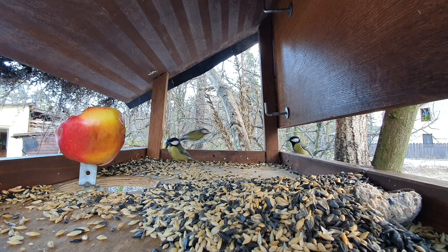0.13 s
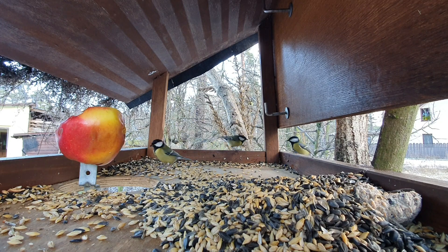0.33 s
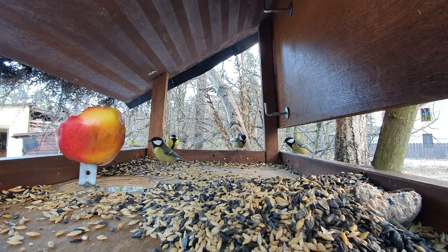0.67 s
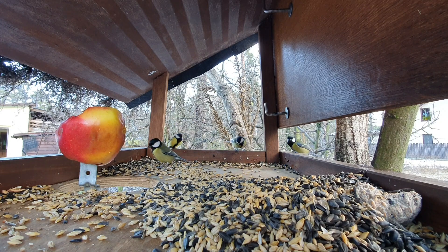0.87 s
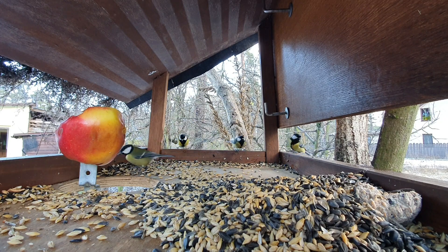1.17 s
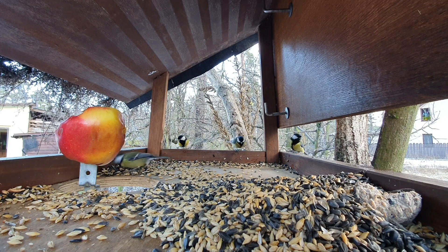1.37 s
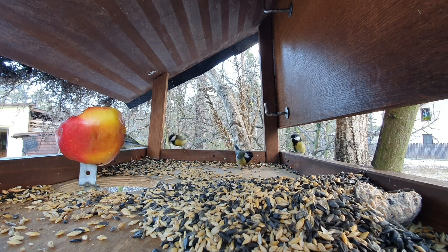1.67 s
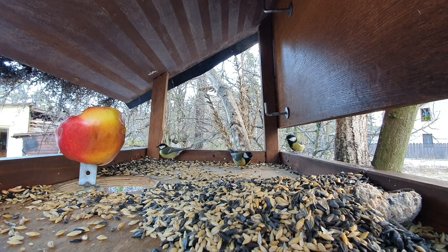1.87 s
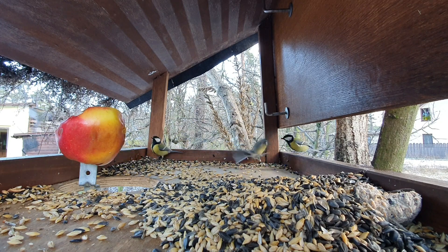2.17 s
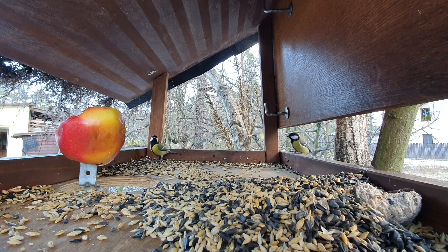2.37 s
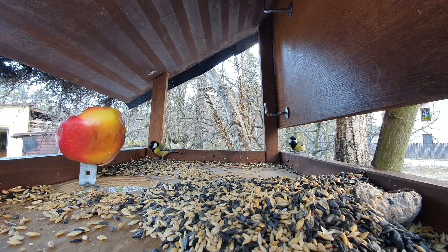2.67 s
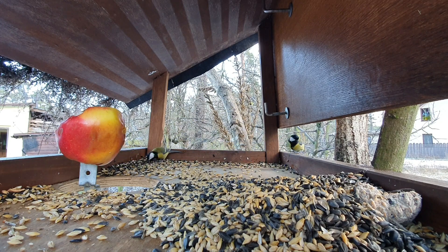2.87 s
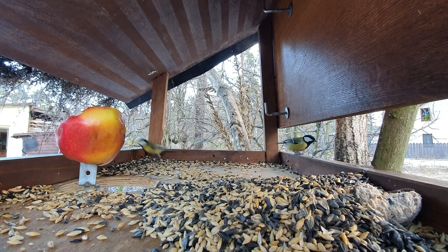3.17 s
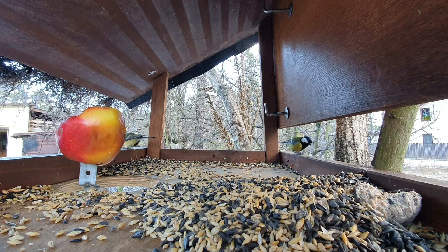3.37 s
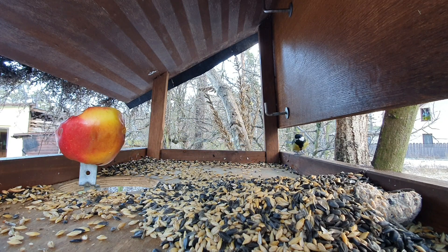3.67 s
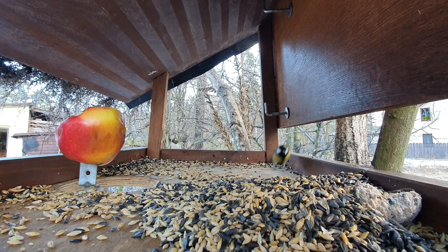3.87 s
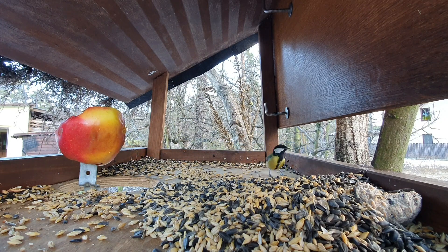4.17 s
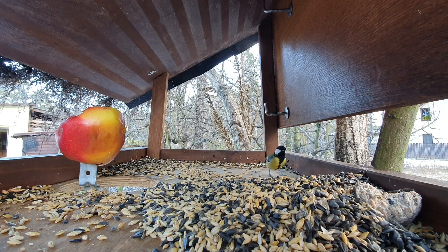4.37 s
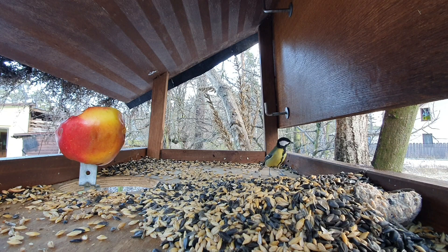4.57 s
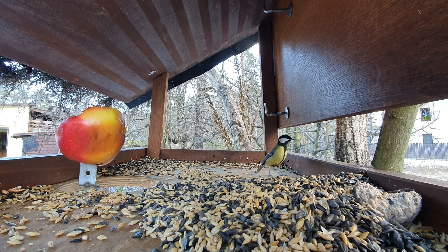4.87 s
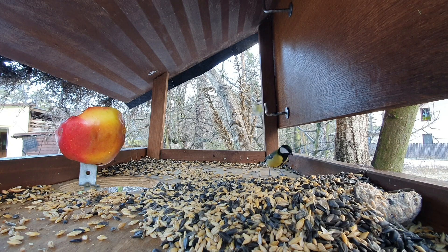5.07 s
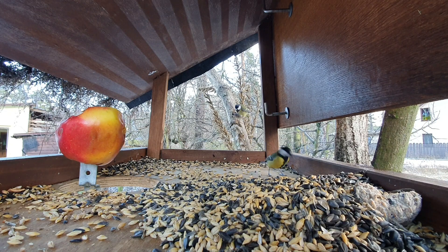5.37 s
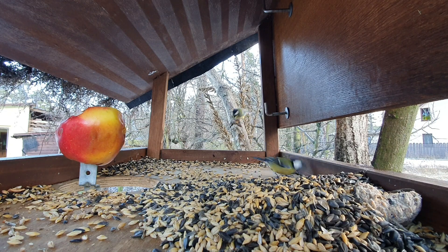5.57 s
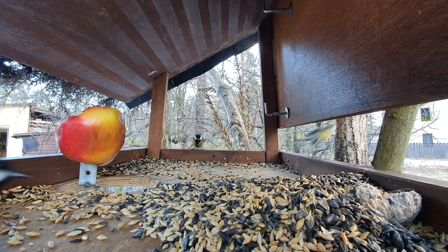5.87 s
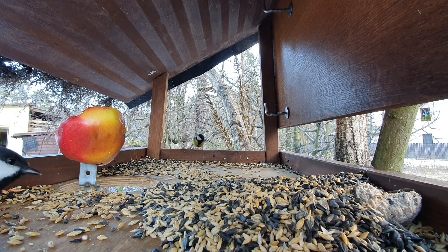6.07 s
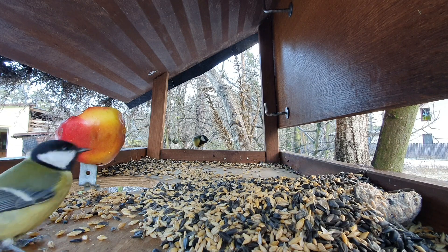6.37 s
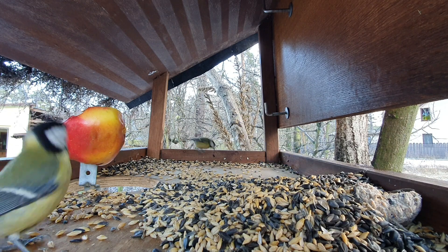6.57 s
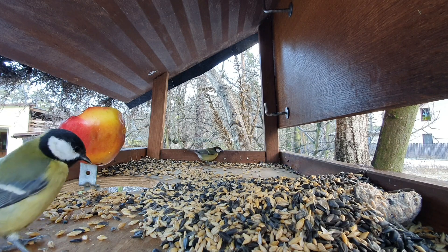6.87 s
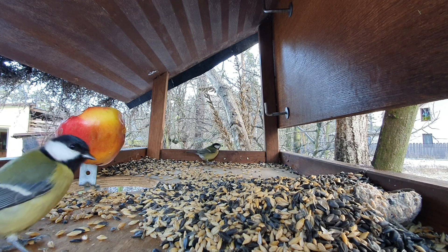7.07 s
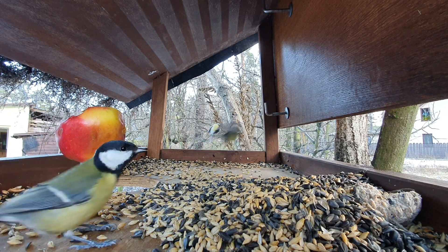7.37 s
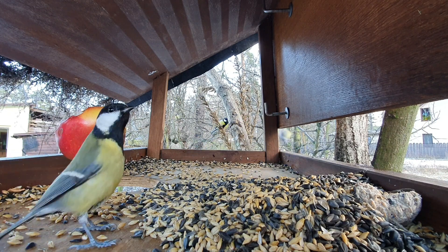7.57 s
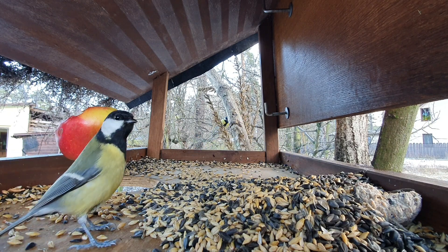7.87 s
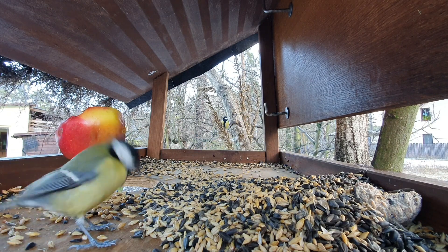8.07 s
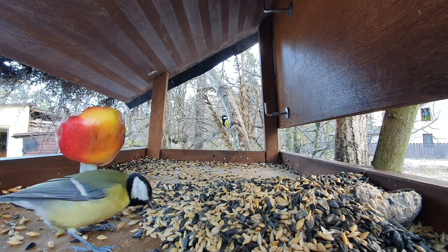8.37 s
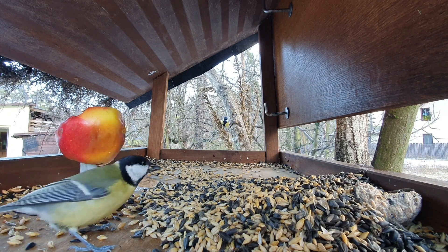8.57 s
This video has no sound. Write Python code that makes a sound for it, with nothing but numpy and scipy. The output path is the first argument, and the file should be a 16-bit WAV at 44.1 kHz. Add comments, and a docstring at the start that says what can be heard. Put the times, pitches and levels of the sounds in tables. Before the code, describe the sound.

Low wind rumbles on the stereo microphones over a faint, steady distant rush. Throughout, tits whistle thin high notes and two-note songs from the trees, slightly left, with a light echo. Close up, small birds hop and peck on a wooden feeder: a flurry of wing flutters, light knocks and scattering seed fills 0.2 to 0.7 seconds, with clear sparrow calls. A second busy flurry runs from 1.7 to 2.4 seconds. Husks snap crisply around 1.2, 2 and 2.3 seconds. A harsh sparrow chirp comes at 3.4, and clear gliding calls near 3.9, 4.7 and 5.8, among lighter rustles. More taps cluster from 5.4 to 5.9 and around 6.7 seconds, then fluttering and seed scatter at about 7.5. Harsh chirps stand out at 7.1 and 8.1 seconds, with a soft thud at 8. The wind gusts at 7.2 and hardest around 8.2 seconds.

```python
"""Wind rumbles on each of two spaced microphones over a far steady rush, and several tits whistle in the
trees, in two-note songs and thin single notes. Close by, small birds land, hop and peck among loose
seed on a roofed wooden feeder; their impacts scatter the seed and excite the damped modes of its boards.
Sparrows call nearby, in clear glides or in harsh chirps from both halves of the voice box at once.
The songs and calls arrive both directly and scattered from trunks and fences."""
import sys
import numpy as np
from scipy import signal
from scipy.fft import rfft, irfft, next_fast_len
from scipy.io import wavfile
from scipy.ndimage import uniform_filter1d, map_coordinates

SR = 44100
rng = np.random.default_rng(int(sys.argv[2]) if len(sys.argv) > 2 else 0)


def int16_out(signal):
    """Quantize to a 16-bit WAV file."""
    q = np.round(np.clip(np.atleast_2d(signal).T, -1, 1) * 32767)
    wavfile.write(sys.argv[1], SR, q.astype(np.int16))


N = 384552
TIME = np.arange(N) / SR

# Levels in all tables are relative.
# Strength of the wind: t/s, level/dB
WIND_LEVEL = [(0, -44), (1.1, -42.5), (1.2, -38), (1.5, -49.5), (2.2, -40.5), (3.1, -46), (3.8, -44.5),
              (4.55, -40), (5.8, -47), (7.08, -37), (7.22, -28.5), (7.33, -42), (7.45, -34.5), (7.9, -30),
              (8.25, -24), (8.4, -35.5), (8.72, -37)]
# Balance of the wind: t/s, left minus right/dB
WIND_BALANCE = [(0, -2), (1.2, -10.5), (3.2, -2.5), (8.2, 7), (8.72, 0.5)]
# Spectra of the buffeting, its flapping upper edge and the far rush: f/Hz, spectral level/dB
BUFFET_SPECTRUM = [(20, -25), (53, 7), (97, 4.5), (134, -7.5), (177, -10), (387, -30.5), (500, -63),
                   (650, -36.5), (1100, -120)]
FLAP_SPECTRUM = [(60, -45), (110, 2.5), (170, 6), (260, -17), (450, -19), (1500, -120)]
RUSH_SPECTRUM = [(88, -38), (150, -3.5), (275, -7.5), (524, -4.5), (1060, -12), (2980, -25), (4580, -33.5),
                 (5790, -36.5), (13400, -48.5), (16000, -38)]
# Likeness of the rush at the two microphones: f/Hz, correlation
RUSH_CORRELATION = [(200, 1), (640, 0.46), (1400, 0), (15000, 0)]

# Contours of the tits' notes: t/s, f/Hz, level/dB
HIGH_NOTE = [(0, 4800, -11), (0.025, 4750, 1), (0.062, 4636, 1.5), (0.125, 4576, -8), (.15, 4600, -47)]
BUZZ_NOTE = [(0, 3450, 6.5), (0.03, 3623, 17.5), (0.058, 3692, 20.5), (.1, 3740, 13.5), (.115, 3966, -7)]
STEP_NOTE = [(0, 4770, -14), (.015, 4735, 3.5), (.045, 4685, -3.5), (.07, 4520, 4), (.095, 4430, -6.5)]
FALL_NOTE = [(0, 3900, -8), (.01, 4300, -1), (.03, 3550, 0), (.05, 2900, -7), (.095, 2650, -8),
             (.11, 2600, -25)]
THIN_NOTE = [(0, 6200, 8), (0.015, 6200, 19), (.065, 6270, 21.5), (.085, 6200, -28)]
# Onsets of high notes, the first singer's except the one at 1.9 s, which is the second singer's, and of a thin
# whistler's: t/s, level/dB, frequency ratio
HIGH_ONSETS = [(-.04, -53.5, .99), (.775, -54.5, .98), (1.385, -54.5, .978), (1.9, -56.5, .975),
               (3.135, -56, .965), (3.25, -57, .997), (3.82, -55.5, .995), (4.445, -54, .995),
               (6.78, -55.5, .995), (7.41, -51.5, .99), (8.018, -57, .985), (8.595, -53, .995)]
THIN_ONSETS = [(.06, -73, 1.002), (.77, -88, .99), (1.485, -85, .972), (2.225, -77, .998),
               (3.61, -82, .972), (7.19, -80.5, .99), (7.9, -84, .968), (8.635, -82, .98)]
# Onsets of the first singer's buzzing notes and the second's falling notes: t/s, level/dB
BUZZ_ONSETS = [(1.06, -71.5), (1.655, -74.5), (3.52, -73.5), (4.1, -70.5), (6.54, -75), (7.08, -71.5),
               (7.68, -71), (8.27, -71.5)]
FALL_ONSETS = [(2.155, -53), (2.565, -54.5), (2.98, -55), (5.24, -55), (5.66, -53.5), (6.07, -54),
               (6.47, -52.5)]
# Stepped high notes, some from the second singer, the faint ones from farther off: t/s, level/dB
STEP_ONSETS = [(.33, -56.5), (.89, -71), (1.61, -69), (1.775, -66), (3.075, -65), (3.745, -65), (7.33, -68),
               (2.295, -54), (2.7, -58), (4.995, -62), (5.375, -59), (6.215, -56.5), (6.625, -59)]

# Bouts of hopping and fluttering: t/s, duration/s, level/dB
FLUTTER_BOUTS = [(0.159, 0.37, -52), (0.602, 0.058, -53.5), (0.83, 0.22, -64.5), (1.131, 0.14, -59.5),
                 (1.703, 0.7, -55), (2.43, 0.19, -62), (2.97, 0.12, -64.5), (3.367, 0.43, -61),
                 (3.882, 0.14, -57.5), (4.399, 0.08, -55.5), (4.664, 0.11, -54.5), (5.38, 0.51, -64),
                 (7.405, 0.1, -51), (7.544, 0.21, -56)]
# Spectrum of dry husks and feathers: f/Hz, spectral level/dB
HUSK_SPECTRUM = [(600, -2.5), (2500, -6.5), (5000, -9.5), (9000, -17.5), (12500, -15), (16000, -17)]
# Modes of the boards: f/Hz, bandwidth/Hz, level/dB
BOARD_MODES = [(505, 1230, 4.5), (777, 500, 9), (1384, 230, 2), (1910, 460, 0.5), (2750, 620, -7)]
# Feet and beaks striking the boards: t/s, level/dB, f/Hz of the struck spot
BOARD_KNOCKS = [(.328, -35.5, 1165), (.598, -39, 1012), (.647, -39.5, 700), (.692, -38, 860),
                (.983, -42, 717), (1.739, -38, 688), (2.135, -42, 530), (2.267, -35.5, 877),
                (2.368, -37.5, 820), (4.366, -50, 606), (5.39, -39, 513), (5.508, -39, 487),
                (5.618, -39, 650), (5.851, -35.5, 700), (6.67, -40, 430), (6.709, -43.5, 750),
                (6.817, -45.5, 1039), (7.66, -42.5, 895)]
# Claws and beaks scattering seed, landings and wing beats on the tray, husks snapping: t/s, level/dB
SEED_SCATTERS = [(0.316, -36), (0.5989, -48), (0.6416, -49), (1.0185, -50), (1.1682, -44.5),
                 (1.2471, -44.5), (1.719, -45.5), (1.7393, -40.5), (1.817, -50), (2.0318, -42.5),
                 (2.2605, -38.5), (2.3304, -36), (3.5733, -42), (3.9742, -41.5), (4.4473, -48.5),
                 (4.734, -44.5), (5.187, -43.5), (5.3882, -43.5), (5.5094, -44), (5.7394, -47),
                 (5.8366, -40.5), (5.952, -49.5), (6.3006, -47.5), (6.7086, -46), (6.7585, -47),
                 (7.1841, -52), (7.3988, -39.5), (7.4285, -42), (7.5977, -48.5), (8.5004, -52)]
TRAY_THUDS = [(0.463, -46), (0.502, -41), (2.06, -46), (2.195, -46.5), (2.24, -46.5), (3.682, -48.5),
              (6.063, -48), (6.189, -48), (7.657, -48), (7.744, -47), (8.047, -36)]
HUSK_SNAPS = [(1.2085, -35.5), (2.0318, -37), (2.3296, -34.5), (3.3513, -43.5)]

# Clear sparrow calls in four parts, delays counted from t: t/s, opening level/dB;
# fall: delay/s, duration/s, end f/Hz, level/dB;
# rise: delay/s, duration/s, start f/Hz, end f/Hz, level/dB; drop: delay/s, start f/Hz, level/dB
CLEAR_CALLS = [(0.169, -49, 0.042, 0.02, 2020, -44.5, .061, 0.035, 2270, 4920, -41, .105, 4460, -32),
               (0.37, -50, 0.027, 0.048, 2500, -47.5, 0.11, 0.02, 3500, 3700, -50, 0.13, 3960, -46.5),
               (3.921, -50.5, 0.019, 0.051, 2295, -49, 0.081, 0.06, 3020, 4160, -56, 0.14, 4160, -60.5),
               (4.676, -48.5, .025, 0.056, 1570, -50.5, .076, 0.0223, 2430, 2980, -45, 0.11, 4130, -35),
               (5.784, -45.5, 0.024, 0.044, 2390, -44.5, 0.065, 0.07, 2860, 3760, -55.5, 0.12, 4100, -54.5)]
# Glides that open each clear call: delay/s, duration/s, start f/Hz, middle f/Hz, end f/Hz, level/dB
OPENING_GLIDES = [(-.011, 0.02, 3100, 4270, 5040, -9), (0, 0.018, 6940, 6670, 6030, 1)]
# Single sparrow glides: a high whistle and rising ending around one harsh chirp, and three separate
# falling calls: t/s, duration/s, start f/Hz, middle f/Hz, end f/Hz, level/dB, overtone level/dB
SINGLE_GLIDES = [(3.37, 0.047, 6100, 6150, 5900, -54, -32), (3.423, 0.05, 2720, 3260, 3320, -47.5, -22),
                 (3.72, 0.038, 4680, 4080, 3720, -54, -25), (5.506, 0.044, 4640, 4020, 3600, -58, -27),
                 (7.259, 0.057, 5920, 4360, 2980, -61, -5)]
# The two voices of a harsh chirp, timed from its break in pitch: t/s, f/Hz, level/dB
UPPER_VOICE = [(-.074, 5900, -32), (-.069, 5800, -11.5), (-.045, 5030, -11), (-.03, 5560, -2),
               (-.012, 4600, -13.5), (0, 4150, 6), (.008, 3660, -23.5)]
LOWER_VOICE = [(-.072, 3310, -42), (-.064, 3330, -13), (-.045, 3600, -2.5), (-.03, 4100, -2.5),
               (-.008, 3855, -2.5), (.004, 3220, 1.5), (.02, 2600, -3.5), (.048, 2370, -7.5),
               (.058, 2270, -21)]
# Harsh chirps: t/s, time stretch, frequency ratio, slide per pulse/Hz, level/dB, lead-in/dB, ending/dB
HARSH_CHIRPS = [(3.424, 0.81, 1.01, 900, -36.5, -1, -18), (7.055, 0.76, 0.98, -700, -31.5, -6.5, 0),
                (8.088, 0.91, 1.0, -650, -31.5, 0.5, -4)]


def amp(db):
    """Amplitude ratio of a level in dB."""
    return 10 ** (np.asarray(db) / 20)


def unit(x):
    """Normalisation to an rms of 1."""
    return x / np.sqrt(np.mean(x ** 2) + 1e-20)


def along(points, hz):
    """Interpolation on a logarithmic frequency axis."""
    f, values = np.transpose(points)
    return np.interp(np.log(hz + 1), np.log(f + 1), values)


def curves(rows, t):
    """Linear interpolation in time of each column after the first."""
    times, *columns = np.transpose(rows)
    return [np.interp(t, times, column) for column in columns]


def wobble(rate):
    """Smooth random modulation: a spline through `rate` knots a second."""
    return map_coordinates(rng.standard_normal(int(N * rate / SR) + 4), [TIME * rate])


def filtered(x, response):
    """Linear filtering: the spectrum is multiplied by a frequency response."""
    size = next_fast_len(N + SR // 4)
    return irfft(rfft(x, size) * response(np.fft.rfftfreq(size, 1 / SR)), size)[..., :N]


def add(track, s, sound):
    """Superposition of a sound on the track, starting at time s."""
    at = round(s * SR)
    part = track[..., max(at, 0):max(at + sound.shape[-1], 0)]
    part += sound[..., max(-at, 0):][..., :part.shape[-1]]


def wind():
    """Turbulent pressure, uncorrelated between the microphones; stronger gusts reach higher and flap."""
    db, pan_db = curves(WIND_LEVEL, TIME)[0], curves(WIND_BALANCE, TIME)[0]
    thumps_db = 4.04 * np.array([wobble(14), wobble(14)])  # common to both layers

    def eddies(spectrum, rate, depth_db):
        lumps = amp(depth_db * np.array([wobble(rate), wobble(rate)]) + thumps_db)
        return unit(lumps * filtered(rng.standard_normal((2, N)), lambda hz: amp(along(spectrum, hz))))

    buffet = amp(5.5) * eddies(BUFFET_SPECTRUM, rate=5, depth_db=2.5)
    flap = amp(0.5 + 0.26 * db) * eddies(FLAP_SPECTRUM, rate=9, depth_db=4.5)
    return amp(db + np.array([pan_db, -pan_db]) / 2) * (buffet + flap)


def far_rush():
    """Diffuse noise of trees and roads, correlated between the microphones only at long wavelengths."""
    def mid_and_side(hz):
        angle = np.arccos(np.clip(along(RUSH_CORRELATION, hz), -1, 1)) / 2
        return amp(along(RUSH_SPECTRUM, hz)) * [np.cos(angle), np.sin(angle)]

    mid, side = filtered(rng.standard_normal((2, N)), mid_and_side)
    swell_db = 0.6 * wobble(2.5) + 0.8 * wobble(8)
    return amp(-52.5 + swell_db) * unit(np.array([mid + side, mid - side]))


def quiver(count, depth):
    """Frequency jitter: a fast random factor around 1."""
    return 1 + depth * unit(uniform_filter1d(rng.standard_normal(count), size=40))


def whistle(hz, gain, trill_hz, swing_hz, overtone_db):
    """A frequency-modulated tone of wavering amplitude; overtone_db sets harmonics 2 and 3."""
    n = np.arange(len(hz))
    trill = swing_hz * np.sin(2 * np.pi * trill_hz * n / SR + rng.uniform(0, 2 * np.pi))
    waver = amp(2.5 * map_coordinates(rng.standard_normal(len(n) // 200 + 2), [n / 300]))
    phase = 2 * np.pi * np.cumsum(hz + trill) / SR
    overtones = amp(overtone_db) * (np.sin(2 * phase) + 0.3 * np.sin(3 * phase))
    return np.sqrt(2) * gain * waver * (np.sin(phase) + overtones)


def song(onsets, contour, trill_hz=60, swing_hz=30, jitter=0.0098):
    """A tone without harmonics repeats one contour, randomly stretched in time."""
    track = np.zeros(N)
    for s, level_db, *ratio in onsets:
        hz, db = curves(contour, np.arange(0, contour[-1][0], rng.normal(1, 0.062) / SR))
        pitch = hz * np.prod(ratio) * quiver(len(hz), jitter)
        add(track, s, whistle(pitch, amp(db + level_db), trill_hz, swing_hz, overtone_db=-np.inf))
    return track


def outdoors(x, pan_db, lag_ms, wet_db, t60):
    """Direct sound with left-minus-right level and delay, plus scattering from trunks and fences."""
    t = np.arange(SR // 2) / SR
    tail = rng.standard_normal((2, len(t))) * amp(-60 * t / t60) * (1 - np.exp(-t / 0.0016))
    swaying = x * unit(1 + 1.1 * wobble(220))  # moving twigs smear the pitch of the echo
    echo = signal.fftconvolve(swaying[None], tail / np.linalg.norm(tail[0]), axes=1)[:, :N]
    side = np.array([[0.5], [-0.5]])
    direct = filtered(x, lambda hz: amp(side * pan_db) * np.exp(-2j * np.pi * hz * side * lag_ms / 1000))
    return direct + amp(wet_db) * echo


def tits():
    """Several tits to the left; rapid frequency modulation makes the first one's low note buzz."""
    first = song(HIGH_ONSETS, HIGH_NOTE) + song(BUZZ_ONSETS, BUZZ_NOTE, trill_hz=217.6, swing_hz=257)
    stepped = song(STEP_ONSETS, STEP_NOTE)
    falling = song(FALL_ONSETS, FALL_NOTE, trill_hz=73.4, swing_hz=134, jitter=0.044)
    return (outdoors(stepped + falling, pan_db=4, lag_ms=-0.47, wet_db=-1, t60=0.7)
            + outdoors(first, pan_db=4, lag_ms=-0.471, wet_db=-2.5, t60=0.95)
            + outdoors(song(THIN_ONSETS, THIN_NOTE), pan_db=3, lag_ms=-0.43, wet_db=-7, t60=0.4))


def activity(floor_db=-73, onset_db_per_s=394, settle_db_per_s=156):
    """Envelope of the birds' movement: each bout grows exponentially, holds and decays to a floor."""
    s, length, db = np.transpose(FLUTTER_BOUTS)[:, :, None]
    before_db = onset_db_per_s * np.maximum(s - TIME, 0)
    after_db = settle_db_per_s * np.maximum(TIME - s - length, 0)
    return np.maximum(amp(np.max(db - before_db - after_db, axis=0)), amp(floor_db))


def husk_colour(x):
    """Spectral shaping to the timbre of dry husks and feathers."""
    return filtered(x, lambda hz: amp(along(HUSK_SPECTRUM, hz)))


def rustle():
    """Granular noise of stirred seed and feathers; each size of husk clumps in its own band."""
    def band(hz):
        clumps = amp(2.5 * wobble(40) + 4 * wobble(250) + 6 * wobble(2500))
        grains = clumps * rng.standard_normal((2, N))
        return filtered(grains, lambda f: np.exp(-(np.log((f + 1) / hz) / 0.3) ** 2))

    husks = sum(band(hz) for hz in np.geomspace(800, 15000, 9))
    return activity() * unit(husk_colour(amp(2.4 * wobble(14)) * husks))


def resonance(f, centre_hz, width_hz):
    """Band-pass response of a damped oscillator."""
    return 1j * f * width_hz / (centre_hz ** 2 - f * f + 1j * f * width_hz)


def boards(f):
    """Response of the boards: a sum of modes of alternating sign."""
    return sum((-1) ** k * amp(db) * resonance(f, hz, width)
               for k, (hz, width, db) in enumerate(BOARD_MODES))


def patter(wingbeat_hz=20.94):
    """Forced vibration of boards and tray under feet and beating wings."""
    def response(f):
        tray = resonance(f, 230, 200) ** 2 / (1 + 1j * f / 450) ** 2
        return boards(f) / (1 + 1j * f / 700) ** 2 + amp(11) * tray

    feet_db = 4.5 * wobble(25)
    wings_db = 5.6 * np.sin(2 * np.pi * wingbeat_hz * TIME + 1.74 * wobble(6))
    force = amp(feet_db + wings_db) * rng.standard_normal(N)
    return activity() * amp(3) * unit(filtered(force, response))


def glide(length, start_hz, middle_hz, end_hz, db, overtone_db=-24):
    """An unsteady parabolic frequency sweep under a rounded envelope."""
    u = np.linspace(0, 1, round(length * SR))
    bend = start_hz + (end_hz - start_hz) * u + 4 * u * (1 - u) * (middle_hz - (start_hz + end_hz) / 2)
    gain = amp(db) * np.sqrt(np.abs(np.sin(np.pi * u)))
    pitch = bend * quiver(len(u), depth=0.039)
    return whistle(pitch, gain, trill_hz=104.7, swing_hz=70, overtone_db=overtone_db)


def sparrow_glides(fall_from_hz=5000, drop_length_s=0.032, drop_to_hz=3333):
    """Frequency sweeps of sparrows: clear calls that open, fall, rise and drop, and single glides."""
    track = np.zeros(N)
    for (s, open_db, fall_at, fall_length, low_hz, fall_db,
         rise_at, rise_length, from_hz, to_hz, rise_db, drop_at, top_hz, drop_db) in CLEAR_CALLS:
        for delay, *shape, db in OPENING_GLIDES:
            add(track, s + delay, glide(*shape, db + open_db))
        fall = glide(fall_length, fall_from_hz, 0.47 * (fall_from_hz + low_hz), low_hz, fall_db)
        rise = glide(rise_length, from_hz, from_hz + 0.75 * (to_hz - from_hz), to_hz, rise_db)
        drop = glide(drop_length_s, top_hz, top_hz + 0.287 * (drop_to_hz - top_hz), drop_to_hz, drop_db)
        for delay, part in (fall_at, fall), (rise_at, rise), (drop_at, drop):
            add(track, s + delay, part)
    for s, *shape in SINGLE_GLIDES:
        add(track, s, glide(*shape))
    return outdoors(track, pan_db=1.5, lag_ms=0.03, wet_db=-8, t60=0.42)


def impacts(events, gain_db, min_rise_s, spiky_db, shared, crack_db):
    """Broadband transients: a crack and a puff of noise per contact, each from its own spot."""
    track, t = np.zeros((2, N)), np.arange(SR // 16) / SR
    for s, db, *_ in events:
        u = t / (min_rise_s * rng.uniform(1, 3.23))
        envelope = u * np.exp(1 - u) + amp(crack_db) * np.exp(-t / 0.0013)
        grains = rng.standard_normal((3, len(t))) * amp(spiky_db * rng.standard_normal(len(t))) * envelope
        common = np.array([grains[2], np.roll(grains[2], rng.integers(-20, 21))])  # unequal paths
        brightness = rng.uniform(0, 0.17)
        puff = signal.lfilter([1, -brightness], [1], shared * common + grains[:2])
        balance_db = rng.normal(0, 0.76) * np.array([[1], [-1]])
        add(track, s, amp(db + gain_db + balance_db) * puff)
    return track


def seed_scatter():
    """Seeds flung by claws and beaks collide in spiky bursts of noise."""
    collisions = impacts(SEED_SCATTERS, gain_db=-3.5, min_rise_s=0.0032, spiky_db=7, shared=1.5, crack_db=0)
    return husk_colour(collisions)


def ring(hz, db, rise_s, t60):
    """Free vibration of one mode: an exponentially damped sine."""
    t = np.arange(SR // 16) / SR
    return amp(db - 60 * t / t60) * np.minimum(t / rise_s, 1) * np.sin(2 * np.pi * hz * t)


def knocks():
    """Impacts excite the board modes and a ring at the struck spot; soft contact weakens the treble."""
    force = impacts(BOARD_KNOCKS, gain_db=-2, min_rise_s=0.002, spiky_db=2, shared=1.27, crack_db=7.5)
    track = filtered(force, lambda f: boards(f) / (1 + 1j * f / 4000) ** 2)
    for s, db, hz in BOARD_KNOCKS:
        add(track, s, ring(hz, db, rise_s=0.0011, t60=0.042))
    return track


def thuds():
    """Landings and wing beats excite a low, heavily damped mode of the tray."""
    track = np.zeros(N)
    for s, db in TRAY_THUDS:
        add(track, s, -ring(hz=210, db=db + 19.5, rise_s=0.001, t60=0.028))
    return track


def husk_snaps():
    """Brittle fracture of a husk in a beak: a brief transient through a broad treble resonance."""
    cracks = impacts(HUSK_SNAPS, gain_db=-8.5, min_rise_s=0.00071, spiky_db=1, shared=1.5, crack_db=1.5)
    return filtered(cracks, lambda f: resonance(f, 12000, 5000))


def harsh_sparrow(pulse_s=0.015, pulse_fade_db=8.5, jitter=0.066, hiss_db=-35, floor_hz=2285):
    """Biphonation in a bird to the left: the voice box's halves sound at odds, in short sliding pulses."""
    track = np.zeros(N)
    for s, stretch, ratio, slide_hz, level_db, lead_db, ending_db in HARSH_CHIRPS:
        for voice, trill_hz in (UPPER_VOICE, 125), (LOWER_VOICE, 170):
            t = np.arange(voice[0][0] * stretch, voice[-1][0] * stretch, 1 / SR)
            hz, db = curves(voice, t / stretch)
            cycle = t / pulse_s % 1
            lead_in, before_break = t < -0.012 * stretch, t < 0
            parts_db = lead_db * lead_in + ending_db * np.clip(t / pulse_s, 0, 1)
            gain = amp(level_db + db + parts_db - pulse_fade_db * cycle) * np.sqrt(np.sin(np.pi * cycle))
            hiss = gain * amp(hiss_db) * np.diff(rng.standard_normal(len(t) + 1)) * before_break
            pitch = ratio * hz * quiver(len(t), jitter * before_break) + slide_hz * (cycle - 0.5)
            tone = whistle(np.maximum(pitch, floor_hz), gain, trill_hz, swing_hz=131, overtone_db=-21.5)
            add(track, s + t[0], hiss + tone)
    return outdoors(track, pan_db=3, lag_ms=-0.43, wet_db=-12, t60=0.25)


def scene():
    """Superposition of all sources at the two microphones."""
    air = wind() + far_rush()
    feeder = seed_scatter() + knocks() + thuds() + husk_snaps() + rustle() + patter()
    return air + feeder + tits() + sparrow_glides() + harsh_sparrow()


def record(dry):
    """Band limiting by an ideal low-pass filter."""
    return filtered(dry, lambda hz: hz < 15850)


dry = scene()
out = record(dry)
int16_out(out)
```